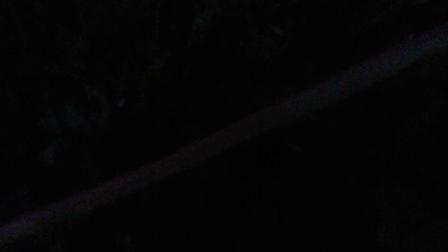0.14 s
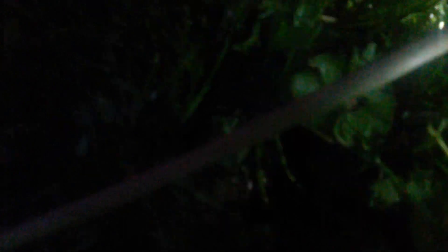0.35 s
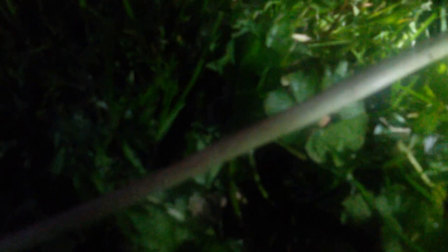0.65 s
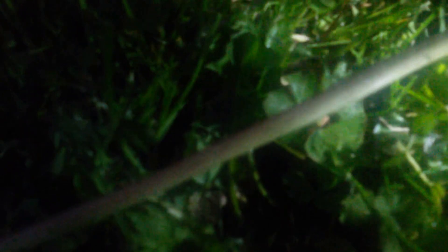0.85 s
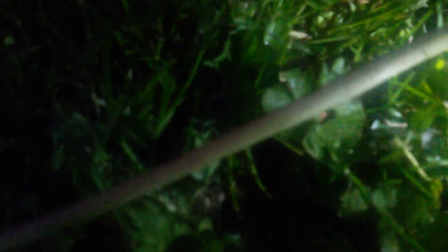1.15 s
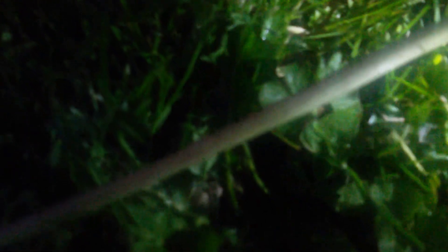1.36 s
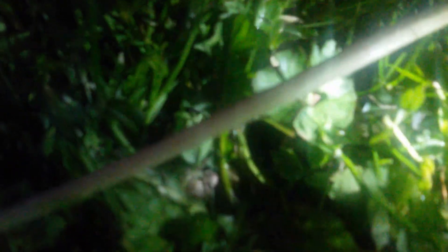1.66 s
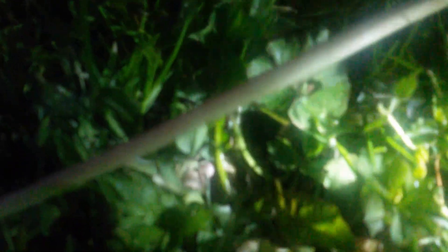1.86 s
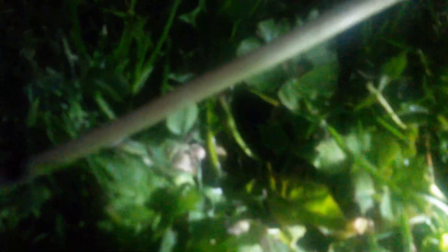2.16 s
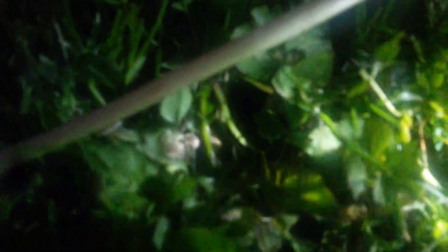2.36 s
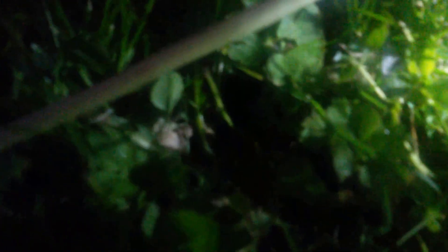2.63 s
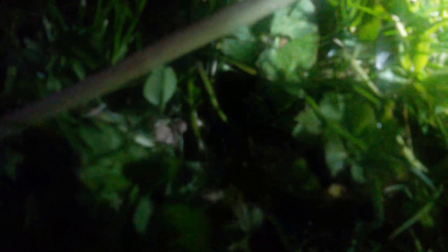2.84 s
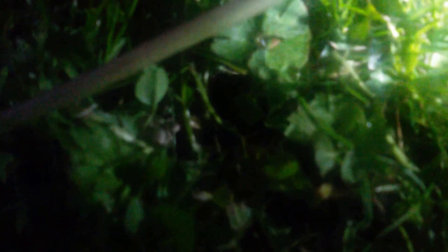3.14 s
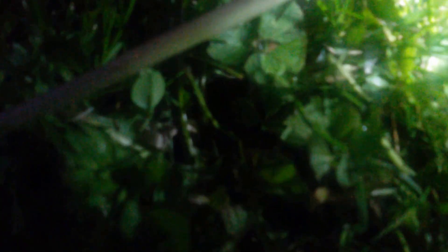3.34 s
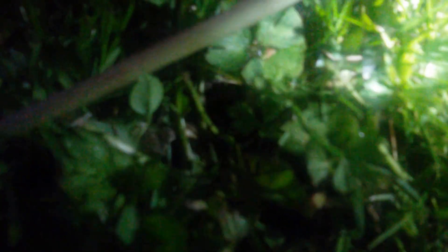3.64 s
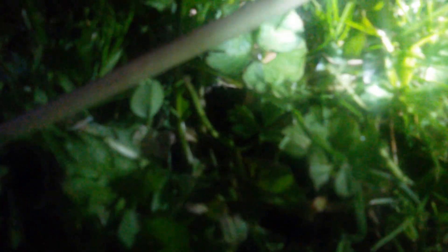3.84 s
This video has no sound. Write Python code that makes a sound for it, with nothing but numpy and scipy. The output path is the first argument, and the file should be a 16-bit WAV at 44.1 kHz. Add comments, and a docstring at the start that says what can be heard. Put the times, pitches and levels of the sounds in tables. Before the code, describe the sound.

A mole cricket trills loudly and close by in the grass at night.

```python
"""In the grass at night, the microphone close to a mole cricket's burrow. Each closing of its wings drags
a file over a scraper and gives a short, nearly pure, falling tone. The trill starts with slow strokes,
runs at about 34 a second, winds down, rests and starts again. Far insects shrill at first, and a small
one rasps high and faint behind the cricket. The recorder's noise gate lets the night air swell with the
trill and sink in the rests."""
import sys
import numpy as np
from scipy import signal
from scipy.fft import rfft, irfft
from scipy.io import wavfile
from scipy.ndimage import map_coordinates

SR = 44100
rng = np.random.default_rng(int(sys.argv[2]) if len(sys.argv) > 2 else 0)


def store_pcm(level_fs):
    """Save levels as 16-bit WAV."""
    pcm = np.round(np.clip(level_fs, -1, 1) * 32767).astype(np.int16)
    wavfile.write(sys.argv[1], SR, np.atleast_2d(pcm).T)


N = 176400


def undb(db):
    """Decibels to gain."""
    return 10 ** (np.asarray(db) / 20)


def unit(x):
    """Scale to rms 1."""
    return x / np.sqrt(np.mean(x ** 2))


def resonate(x, hz, width):
    """Two like resonances in series, each `width` Hz wide, with gain 1 at the centre."""
    b, a = signal.iirpeak(hz, hz / width, fs=SR)
    return signal.lfilter(b, a, signal.lfilter(b, a, x))


def walk(rate):
    """A smooth random curve of rms 1 that changes `rate` times a second."""
    steps = np.arange(N) / SR * rate
    return unit(map_coordinates(rng.standard_normal(N), [steps], order=2, mode="mirror"))


def add(out, start, sound):
    """Mix a sound in from a start time in seconds."""
    part = out[max(int(start * SR), 0):][:len(sound)]
    part += sound[:len(part)]


def colour(x, points):
    """Minimum-phase filter through (f/Hz, level/dB) points."""
    hz, db = np.array(points).T
    curve_db = np.interp(np.log(np.fft.rfftfreq(2 * N, 1 / SR) + 1), np.log(hz), db)
    cepstrum = irfft(np.log(undb(curve_db)))
    cepstrum[1:N] *= 2
    cepstrum[N + 1:] = 0
    return irfft(rfft(x, 2 * N) * np.exp(rfft(cepstrum)))[:N]


def night_air():
    """A soft, steady hiss all around the microphone."""
    # spectrum of the air, with a far insect chorus near 5 kHz: f/Hz, relative level/dB
    spectrum = [(20, -16.5), (70, 0.5), (200, -1), (600, -6.5), (1500, -5.5), (3600, -11.5), (5200, -12),
                (7500, -14.5), (9200, -21.5), (14500, -18.5)]
    return undb(-51.5) * unit(colour(rng.standard_normal(N), spectrum))


def far_insects():
    """A faint, shrill hiss of insects in the distance that fades away early."""
    fade_s = 0.35
    shrill = unit(resonate(rng.standard_normal(N), hz=5150, width=2100))
    return undb(-54) * np.exp(-(np.arange(N) / SR / fade_s) ** 2) * shrill


def mole_cricket():
    """Close by, file teeth drive the wing at its pitch, slowing through each stroke; the scraper grates."""
    # wing strokes: t/s, length/ms
    strokes = [(0.3299, 16.5), (0.3933, 14.2), (0.4309, 9.8), (0.4597, 7.3), (0.4893, 5.2), (0.5179, 6.6),
               (0.5459, 4.6), (0.5747, 5.2), (0.6292, 12.3), (0.6586, 12.6), (0.6889, 12.1), (0.7183, 12.6),
               (0.7486, 12.6), (0.7794, 12.2), (0.8088, 12.7), (0.8401, 11.7), (0.8711, 10.9),
               (0.9021, 11.0), (0.9333, 5.1), (0.9641, 6.4), (0.9945, 12.8), (1.0269, 6.4), (1.057, 11.6),
               (1.0873, 12.6), (1.1186, 12.1), (1.1497, 12.6), (1.1809, 11.7), (1.2118, 11.4),
               (1.243, 10.9), (1.2725, 11.8), (1.3036, 10.3), (1.3332, 11.5), (1.3644, 10.4),
               (1.3942, 10.7), (1.4235, 10.5), (1.4525, 11.2), (1.4825, 10.5), (1.5113, 10.7),
               (1.5411, 2.4), (1.5489, 1.3), (1.5704, 10.4), (1.5997, 10.1), (1.6289, 9.8), (1.6574, 10.7),
               (1.6881, 10.8), (1.717, 10.9), (1.7475, 9.9), (1.777, 9.7), (1.806, 9.8), (1.8353, 9.3),
               (1.8642, 10.0), (1.8937, 10.1), (1.922, 10.2), (1.952, 9.4), (1.9811, 9.6), (2.0099, 10.2),
               (2.0399, 9.7), (2.0687, 10.6), (2.099, 9.5), (2.1285, 8.9), (2.1573, 8.5), (2.1862, 8.6),
               (2.2145, 9.4), (2.2436, 10.1), (2.2724, 11.0), (2.3018, 9.1), (2.3312, 2.5), (2.3588, 10.3),
               (2.3878, 9.5), (2.4168, 8.4), (2.445, 8.4), (2.4731, 10.4), (2.5019, 11.4), (2.5313, 11.5),
               (2.561, 12.6), (2.5927, 12.7), (2.6242, 14.0), (2.6577, 16.6), (2.6953, 17.5),
               (2.7478, 17.1), (2.8011, 19.3), (3.1009, 17.5), (3.1907, 17.6), (3.2269, 11.0),
               (3.2632, 10.8), (3.2973, 8.0), (3.327, 5.7), (3.3566, 5.4), (3.4113, 11.9), (3.4414, 10.9),
               (3.4706, 11.3), (3.4998, 12.7), (3.5288, 13.8), (3.5591, 13.8), (3.59, 13.3), (3.6204, 12.2),
               (3.6509, 12.0), (3.682, 10.2), (3.7121, 9.2), (3.7423, 7.7), (3.7698, 10.2), (3.8002, 3.9),
               (3.8293, 10.6), (3.8594, 5.1), (3.8888, 11.1), (3.9191, 11.7), (3.9483, 12.2),
               (3.9791, 10.5)]
    # the cricket's effort: t/s, drive level/dB, f/Hz, scraping/dB
    effort = [(.33, -23, 1560, 6.5), (.43, -21, 1562, 9.5), (.575, -16, 1587, 5), (.63, -15.5, 1626, 2),
              (0.901, -15.5, 1621, -1), (1.25, -14.5, 1620, 3), (2.449, -14.5, 1618, -3.5),
              (2.698, -15, 1616, 4), (2.802, -17, 1595, 6), (3.1, -24, 1576, -8.5),
              (3.19, -21.5, 1570, 8.5), (3.26, -19, 1560, 2), (3.332, -14, 1550, 3),
              (3.41, -16.5, 1606, -2), (3.738, -14, 1619, -4), (3.98, -14.5, 1607, -6)]
    # harmonics 2 to 5 at full effort, against the tone: level/dB at the catch, in mid stroke, at the end
    overtones = [(-19.5, -31, -22.5), (-29.5, -45, -26.5), (-29, -47.5, -55.5), (-43.5, -42, -47.5)]
    # where those three levels lie: share of the stroke
    overtone_shares = [0, .35, 1]
    # moments where the scraper skips a tooth: t/s
    skips = [0.5763, 3.3288, 3.3583, 3.8022]
    attack_ms, build_ms, swell_ms, ring_ms = 0.47, 1.63, 21.94, 1.6
    crest_share, release_share = .57, 0.041  # of the stroke's length
    glide, scatter, leap = .044, 0.004, 0.6  # shares of the pitch
    leap_ms, free_hz = 1.08, 1630  # the wing rings at free_hz once it is let go
    tooth_jitter, tooth_shimmer = 0.005, 0.018  # unevenness of the file
    catch_db, catch_ms, slip_db = -17.5, 1.34, -34.5
    skip_db, skip_ms = -4.5, 0.16
    reopen_db, reopen_ms = -36.5, 21.7

    tone, scrape = np.zeros(N), np.zeros(N)
    effort_times, *effort_curves = np.array(effort).T
    ms = np.arange(SR // 25) / SR * 1000
    detunes = rng.standard_normal(len(strokes))
    teeth = rng.standard_normal((len(strokes), 3, len(ms)))
    for (start, length), detune, (spacing, height, grit) in zip(strokes, detunes, teeth):
        db, hz, scrape_db = (np.interp(start, effort_times, curve) for curve in effort_curves)
        softness_db = effort_curves[0].max() - db
        gain = undb(db) * (1 - np.exp(-length / build_ms))  # brief strokes never reach full swing
        rough = undb(scrape_db + 0.6 * max(11 - length, 0))  # strokes under 11 ms scrape more
        per_tooth = lambda values: rough * np.interp(ms * hz / 1000, np.arange(len(values)), values)

        travel = np.minimum(ms / length, 1)
        slowness = min(length / swell_ms, 1) ** 2
        swell = 1 - slowness * (1 - travel / crest_share) ** 2
        released_ms = release_share * length * np.logaddexp(0, (ms / length - 1) / release_share)
        envelope = (1 - np.exp(-(ms / attack_ms) ** 2)) * swell * np.exp(-released_ms / ring_ms)
        engaged = 1 / (1 + np.exp(2 * (ms - length - 1)))  # falls to 0 as the scraper leaves the file

        sharp_start = leap * slowness ** 2 * undb(-softness_db) * np.exp(-ms / leap_ms)
        bend = glide * (.5 - travel) + sharp_start + scatter * detune
        tooth_hz = hz * (1 + bend + tooth_jitter * per_tooth(spacing))
        phase = 2 * np.pi * np.cumsum(engaged * tooth_hz + (1 - engaged) * free_hz) / SR

        levels = [np.interp(travel, overtone_shares, row) for row in overtones]
        levels[1] += slowness * (levels[1][-1] - levels[1])  # slow strokes hold the third harmonic
        harmonics = sum(undb(level) * np.sin(k * phase) for k, level in enumerate(levels, 2))
        reedy = engaged * undb(0.71 * softness_db)  # softer strokes have more overtones
        wave = np.sin(phase) + reedy * harmonics

        # a skipped tooth stalls the wing and restarts it in opposite phase
        skips_ms = [at for at in 1000 * (np.array(skips) - start) if 0 < at < length]
        stall = np.prod([undb(skip_db) * np.tanh((at - ms) / skip_ms) for at in skips_ms], axis=0)
        shimmer = 1 + tooth_shimmer * per_tooth(height)
        add(tone, start, gain * envelope * stall * shimmer * wave)

        catch = undb(catch_db) * swell * np.exp(-ms / catch_ms)
        slip = undb(slip_db) * envelope
        brush = undb(reopen_db) * np.exp(-((ms - reopen_ms) / 2) ** 2 / 2)  # the wings open again
        add(scrape, start, gain * grit * (rough * (catch + slip) + brush))
    return tone + wing_resonances(scrape)


def wing_resonances(scrape):
    """Catches and slips of the scraper ring the wing's other resonances."""
    # wing resonances: f/Hz, width/Hz, relative level/dB
    modes = [(1452, 265, 8), (3204, 890, 4), (4380, 600, -4)]
    return sum(undb(db) * np.sqrt(SR / np.pi / width) * resonate(scrape, hz, 2 * width) / 2
               for hz, width, db in modes)


def burrow(song):
    """Burrow and ground colour the song; the bass is cut, as the small wings radiate none."""
    # response of burrow and ground: f/Hz, level/dB
    response = [(700, -2), (930, 4.5), (1110, -6), (1290, 2.5), (1620, -0.3), (2050, 1), (2600, -9),
                (3000, -2.5)]
    low_cut = signal.butter(2, 760, "high", fs=SR, output="sos")
    return signal.sosfilt(low_cut, colour(song, response))


def ground_scatter(song):
    """Faint, short echoes from the ground and plants; they shift as the microphone moves."""
    echo_db, t60_s = -32, 0.1
    t = np.arange(SR // 2) / SR
    echoes = 0
    for _ in range(4):
        tail = rng.standard_normal(len(t)) * np.exp(-np.log(1000) * t / t60_s)
        echoes += walk(rate=4.76) * signal.fftconvolve(song, tail / np.linalg.norm(tail))[:N] / 2
    return undb(echo_db) * echoes


def small_insect():
    """Behind the cricket, short, faint rasps in one high resonance."""
    # rasps: middle t/s, length/s, level/dB
    rasps = [(0.41, 0.1, -56), (0.736, 0.085, -60), (1.015, 0.075, -59), (1.279, 0.06, -58),
             (1.562, 0.05, -60.5), (1.746, 0.085, -59), (2.176, 0.105, -59.5), (2.518, 0.075, -60),
             (2.913, 0.09, -58), (3.256, 0.055, -58), (3.533, 0.075, -60.5), (3.778, 0.065, -60.5)]
    t = np.arange(N) / SR
    envelope = sum(undb(db) * np.exp(-((t - middle) / (length / 2)) ** 4) for middle, length, db in rasps)
    return envelope * unit(resonate(rng.standard_normal(N), hz=10680, width=1300))


def scene():
    """At one microphone: the cricket in front, its scatter, the other insects and the air behind."""
    cricket = burrow(mole_cricket())
    return (cricket + ground_scatter(cricket) + small_insect() + far_insects() + night_air())[None]


def record(dry):
    """The recorder's noise gate passes strong tones; all else follows the recent level. The top is cut."""
    tone_threshold_db, open_db, floor_db, gate_s = -58, -25.5, -13, 0.036
    decay = np.exp(-1 / (gate_s * SR))
    recent_level = signal.lfilter([1 - decay], [1, -decay], abs(signal.hilbert(dry)))
    gain = np.minimum(np.hypot(undb(floor_db), recent_level / undb(open_db)), 1)
    bands = signal.stft(dry, nperseg=512)[2]
    passed = 1 / (1 + (undb(tone_threshold_db) / (abs(bands) + 1e-12)) ** 4)
    strong = signal.istft(bands * passed)[1][:, :N]
    high_cut = signal.ellip(12, .2, 70, 14600, fs=SR, output="sos")
    return signal.sosfilt(high_cut, strong + gain * (dry - strong))


dry = scene()
out = record(dry)
store_pcm(out)
```